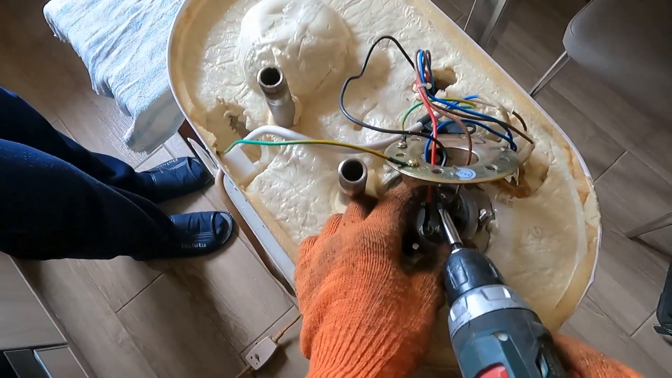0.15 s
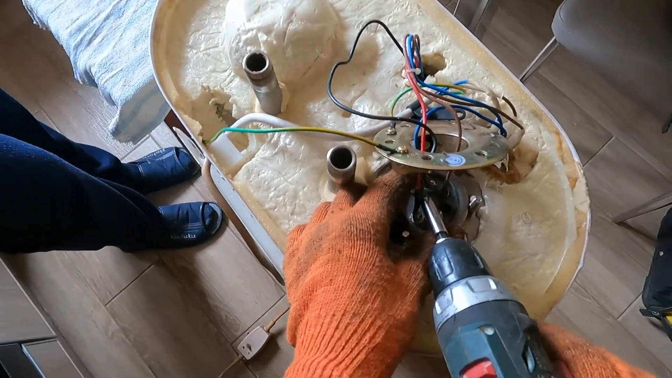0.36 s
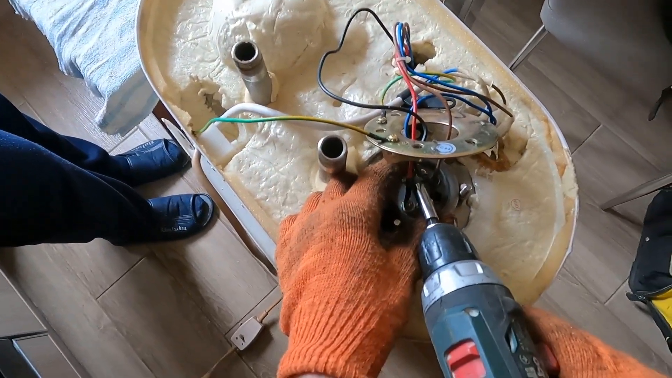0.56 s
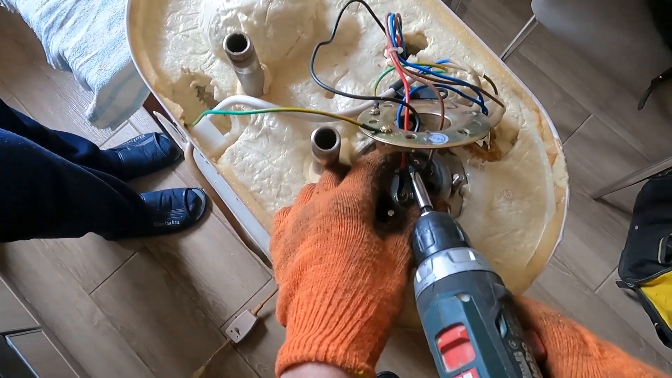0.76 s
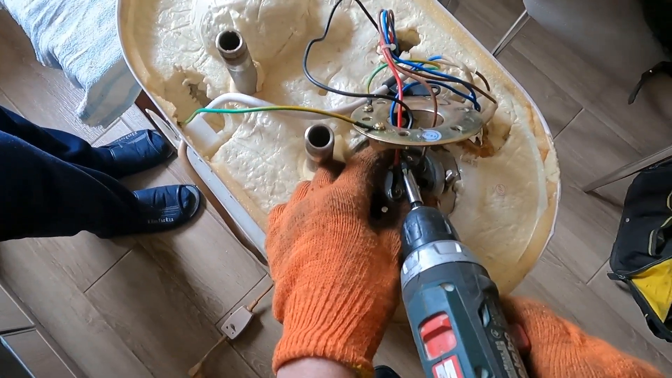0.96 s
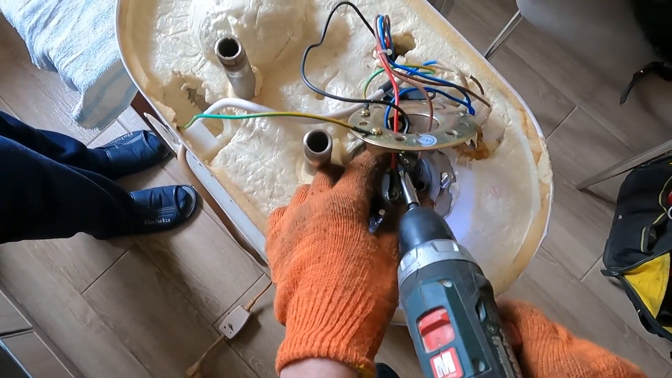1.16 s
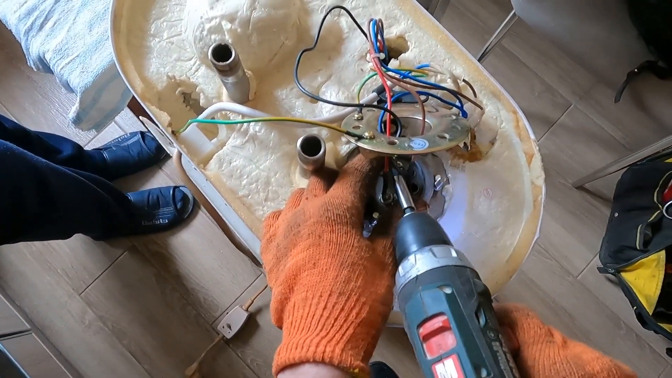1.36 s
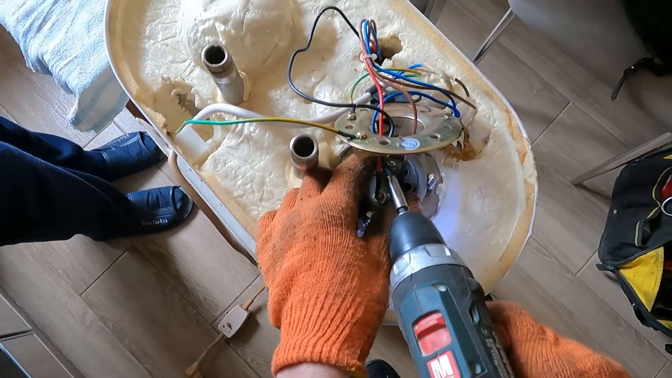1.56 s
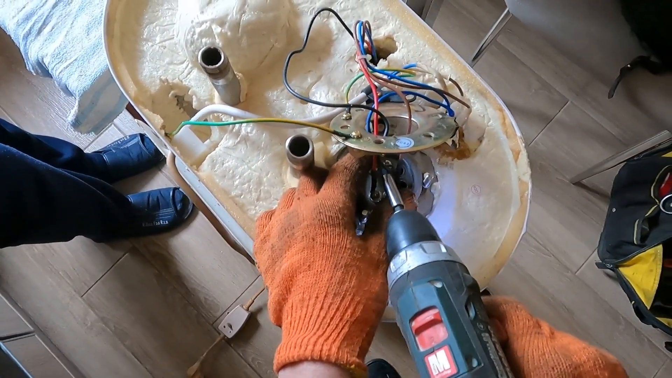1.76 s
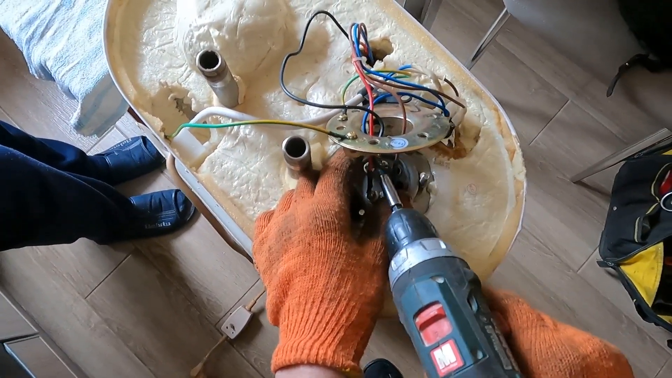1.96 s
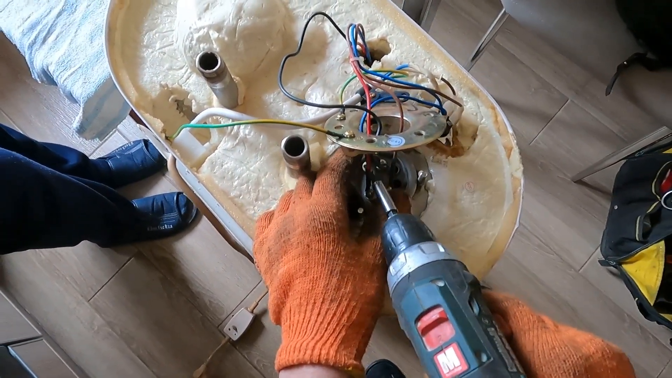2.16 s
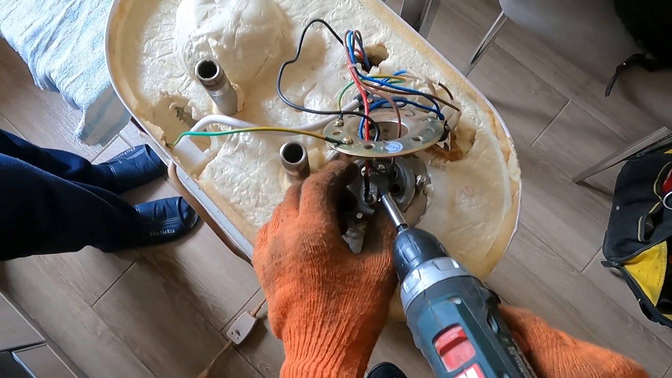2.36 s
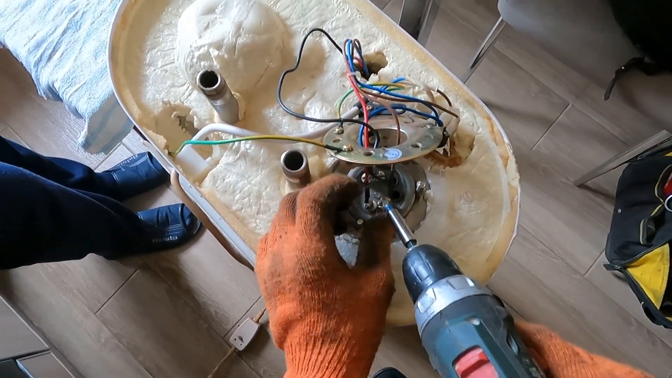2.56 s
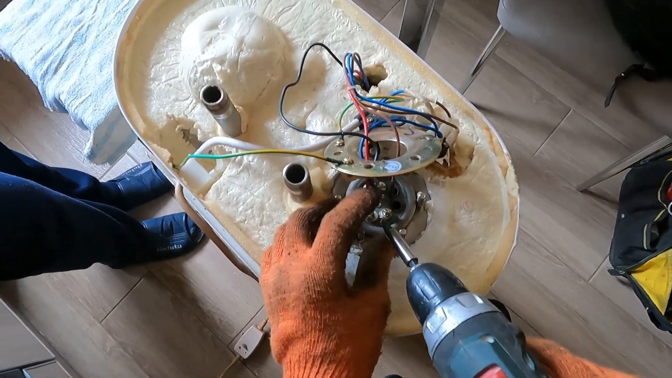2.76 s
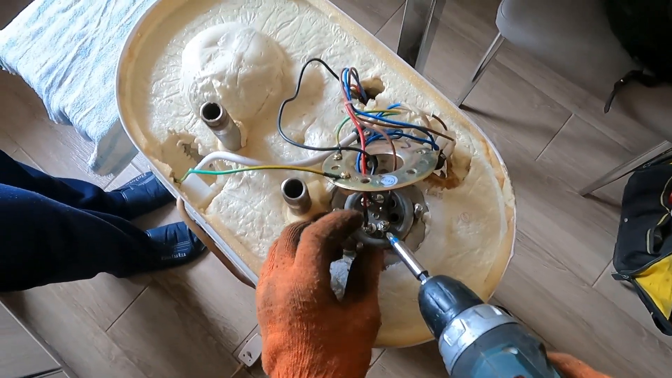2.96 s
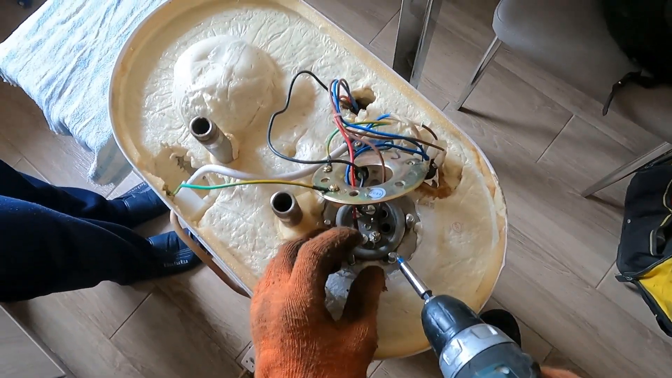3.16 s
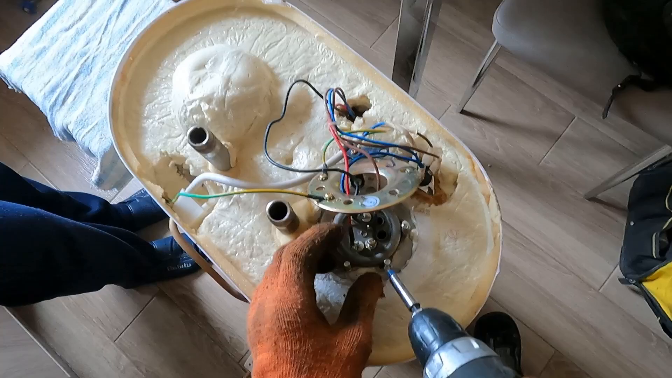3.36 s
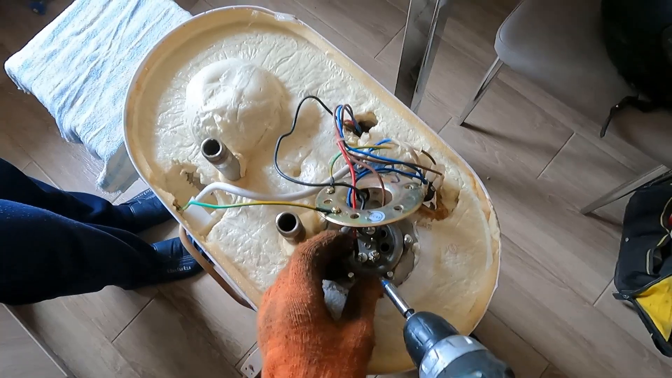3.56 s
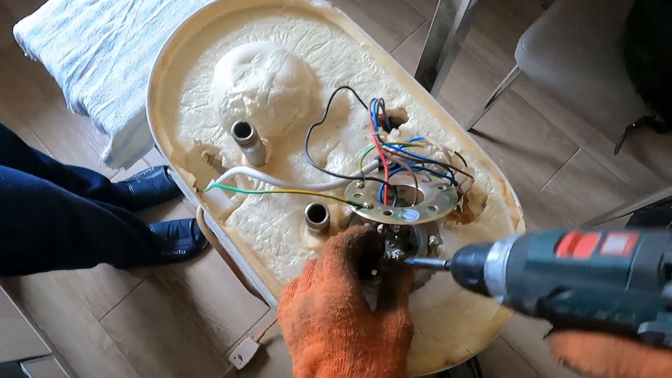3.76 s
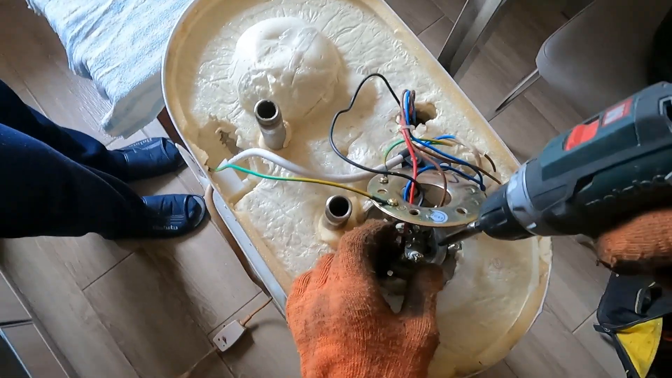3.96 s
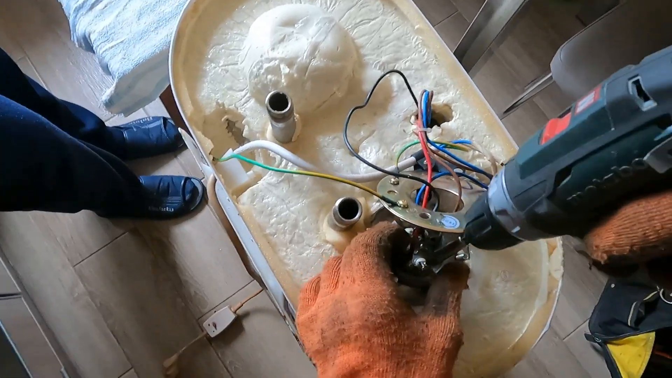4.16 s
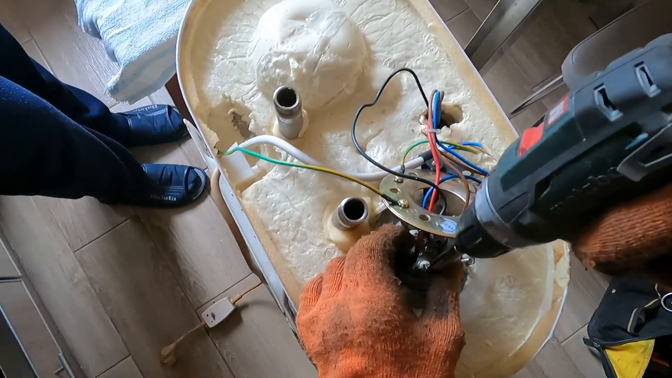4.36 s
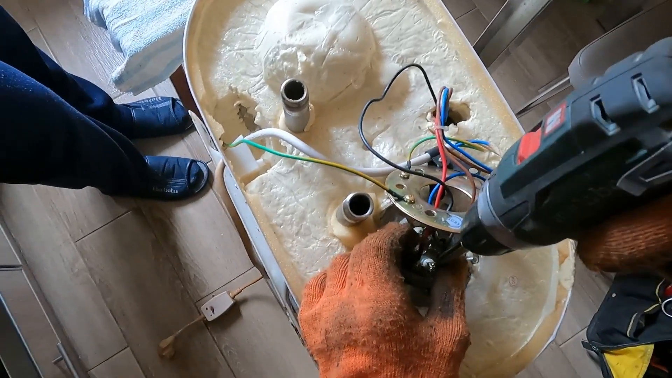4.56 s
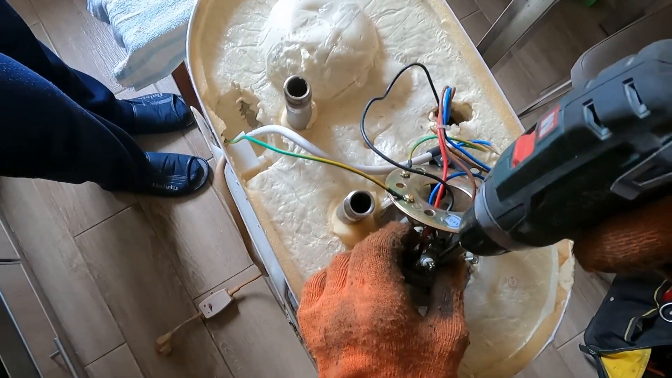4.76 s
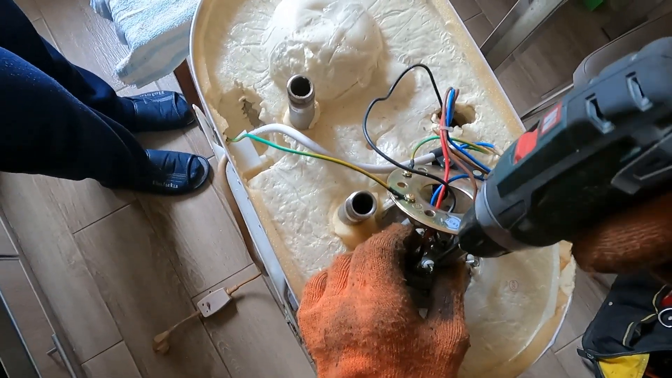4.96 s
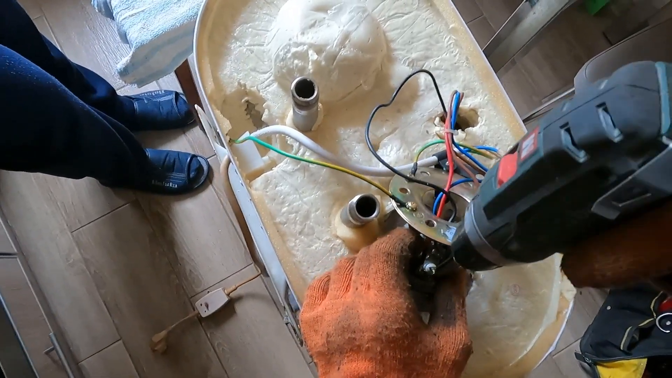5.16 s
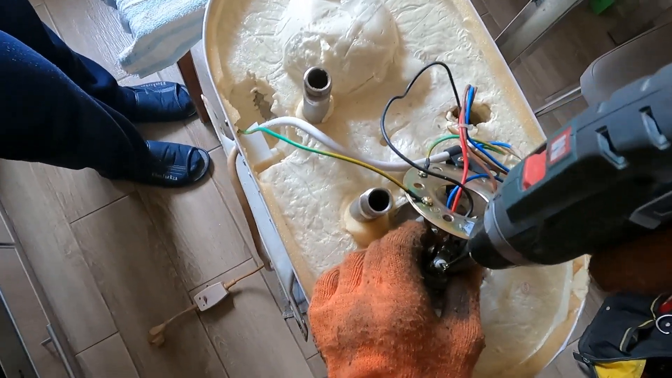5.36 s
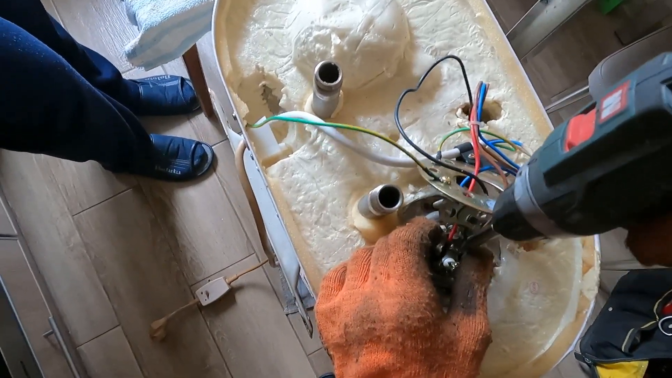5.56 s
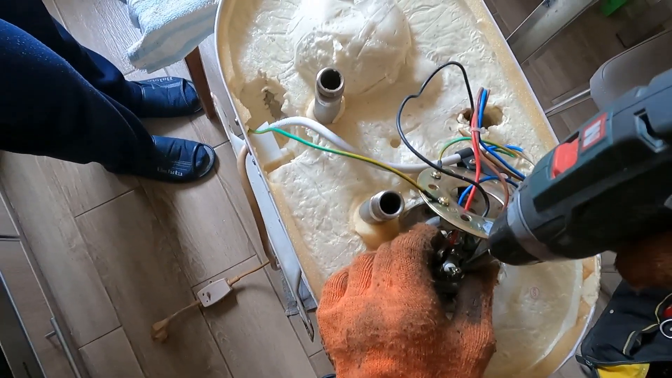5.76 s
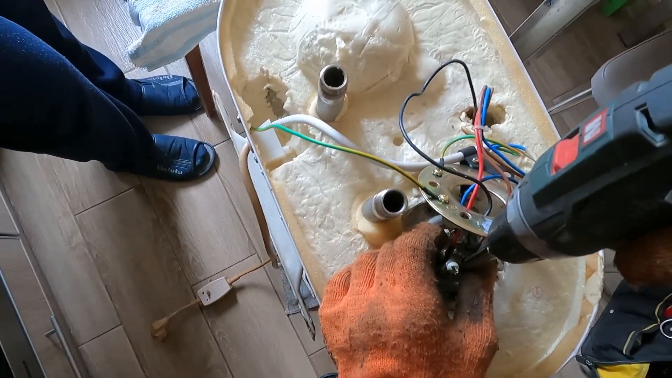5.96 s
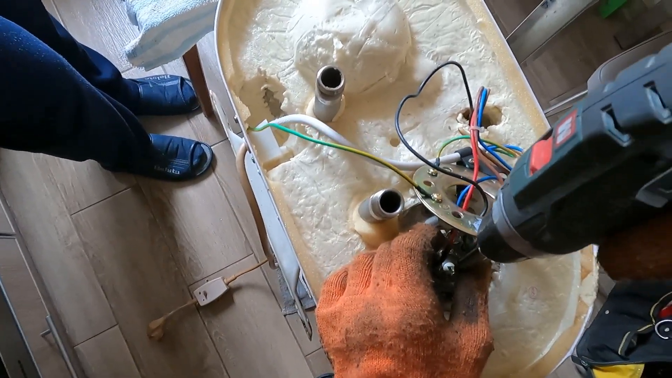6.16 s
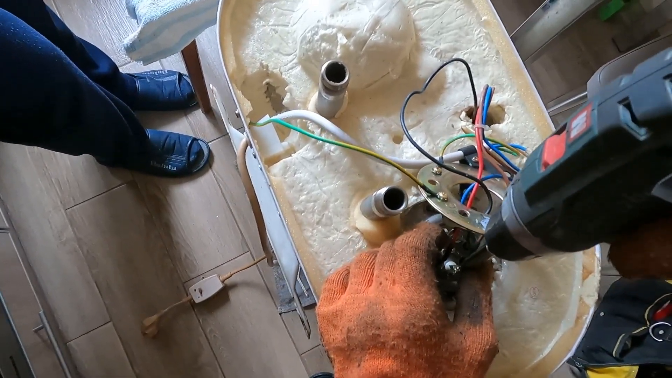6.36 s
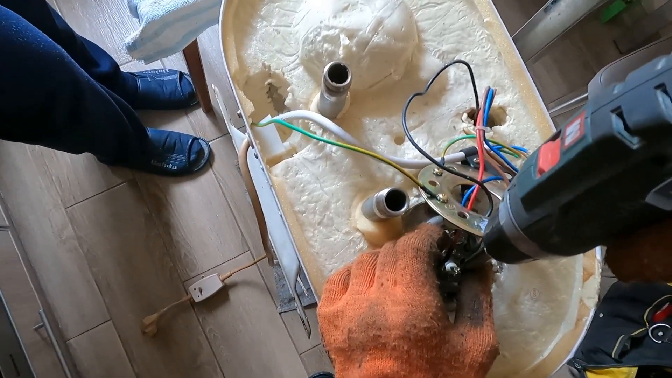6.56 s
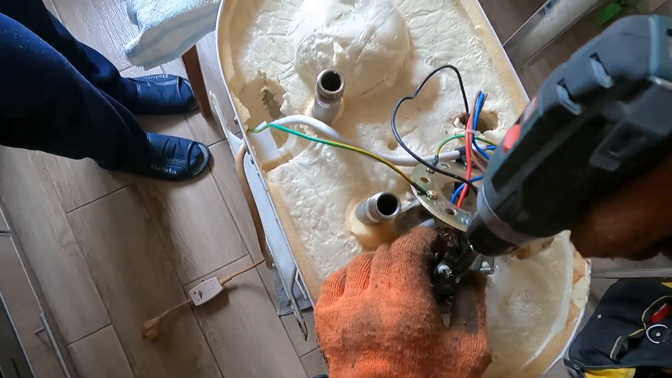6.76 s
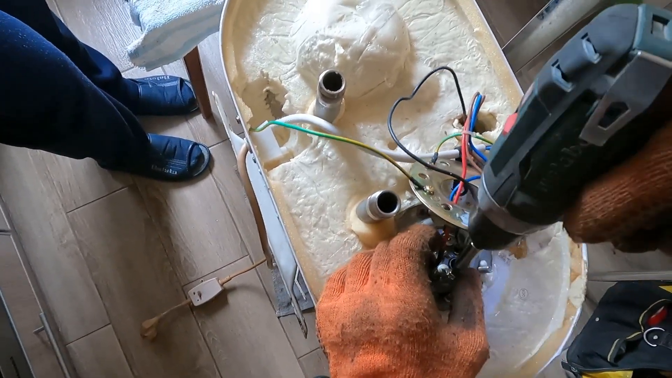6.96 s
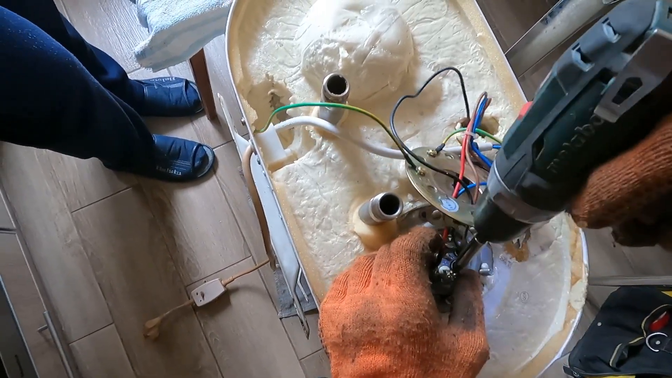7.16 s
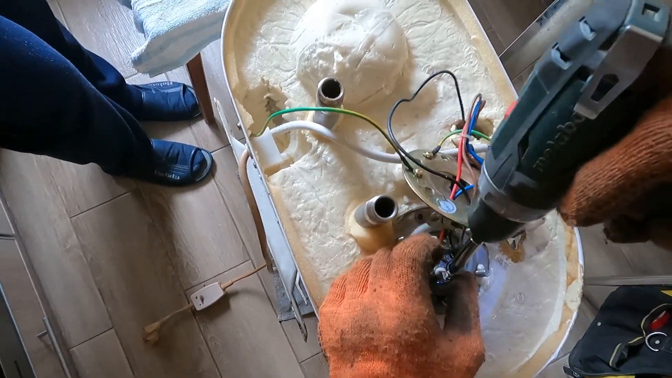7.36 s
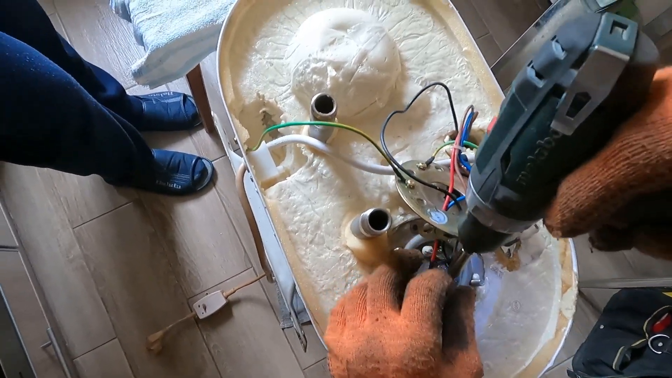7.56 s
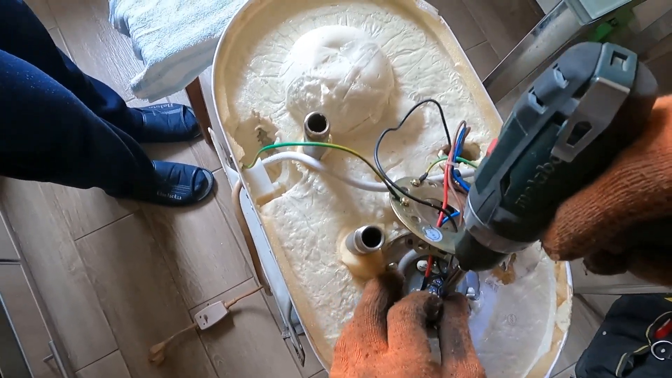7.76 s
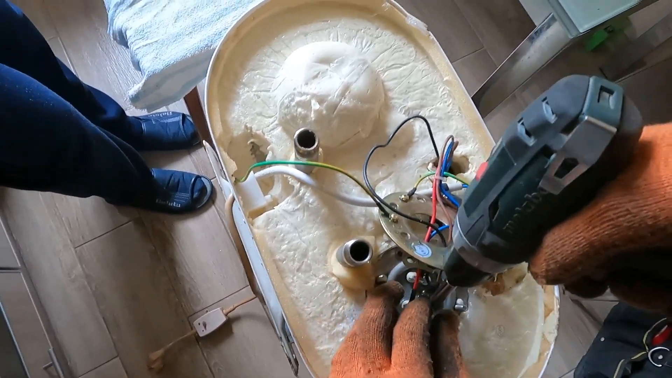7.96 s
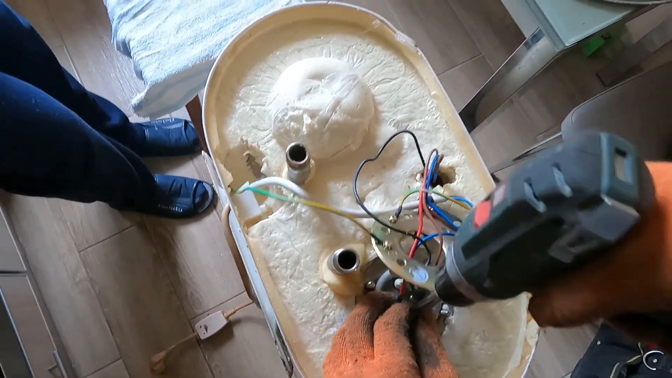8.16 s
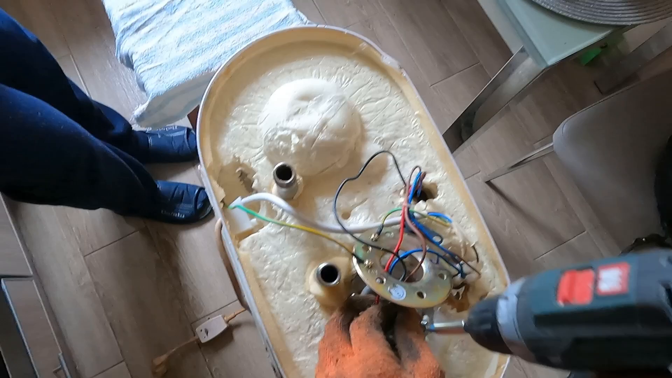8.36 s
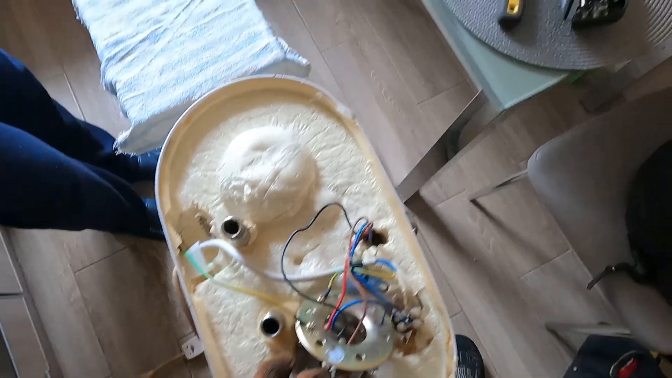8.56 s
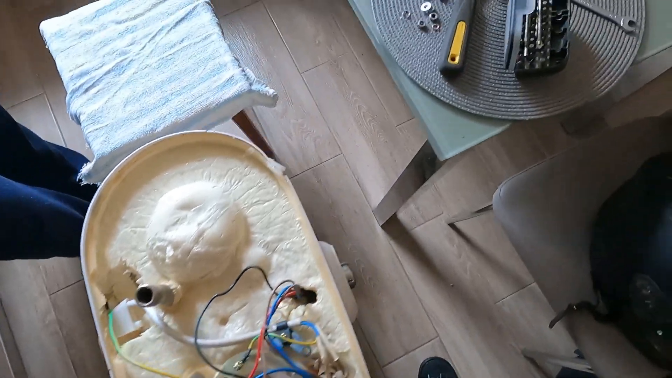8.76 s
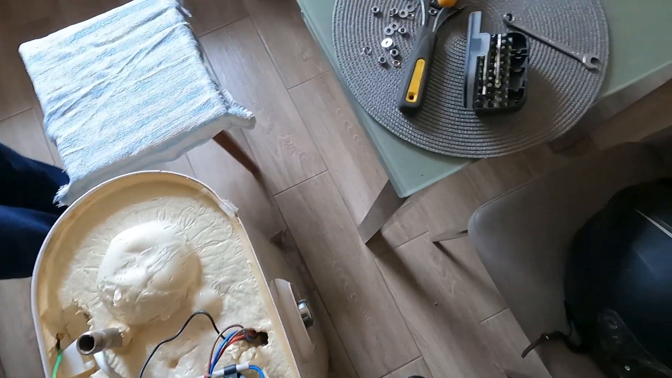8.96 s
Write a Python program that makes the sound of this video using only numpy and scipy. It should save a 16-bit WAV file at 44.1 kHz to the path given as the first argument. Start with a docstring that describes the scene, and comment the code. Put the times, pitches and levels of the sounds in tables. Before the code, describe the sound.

A low hum fills a small room, and the work is heard up close. Gloves rustle and small parts tick, with a few soft thumps. At about 1.1 seconds a cordless drill starts with a thin, high whistle, its motor whine climbing over rattling gears, then holds and stops with a click at 2 seconds. Faint ticks, light scrapes and glove rubbing follow. From 4 to 6 seconds a steel socket clinks more sharply against nuts, and the water heater tank gives dull knocks, the strongest near 5.9 seconds. Around 7 seconds the drill starts again with a whistle and a sharp click, running slower and lower, and winds down by about 8.1 seconds. A short scrape, a few last metallic clinks and some rustling continue until about 9 seconds.

```python
"""A cordless drill-driver undoes nuts on a water heater in a small room, heard from the worker's head.
Gloves rustle and parts tick; at 1 s the drill runs: the switch chops its current, the motor whines on
multiples of its shaft speed, and the gear teeth rattle the housing. Then the steel socket scrapes and
clinks on nuts, and the tank knocks and rocks. At 7 s the drill runs again, more slowly, and a few last
clinks follow. The room hums low throughout."""
import sys
import numpy as np
from scipy import signal
from scipy.fft import rfft, irfft, next_fast_len
from scipy.io import wavfile
from scipy.ndimage import uniform_filter1d

SR = 44100
rng = np.random.default_rng(int(sys.argv[2]) if len(sys.argv) > 2 else 0)


def store_wav(level_fs):
    """Save 16-bit WAV to argv[1]."""
    pcm = np.round(np.clip(np.atleast_2d(level_fs), -1, 1) * 32767)
    wavfile.write(sys.argv[1], SR, pcm.T.astype(np.int16))


N = 397341
T = np.arange(N) / SR

# Modes of the tank shell. Each row: frequency in Hz, level in dB, 60 dB decay time in seconds.
TANK_MODES = [(950, -5, .045), (1140, -3, .055), (1340, 0, .07), (1600, -2, .055), (1900, -4, .05),
              (2270, -7, .05)]
# Hand and tool thumping the shell. Each row: start in seconds, level in dB, pitch in Hz, rumble in dB.
THUMPS = [(0.181, -38, 184, -66), (0.25, -55, 180, -60), (0.605, -44.5, 190, -54), (0.764, -39.5, 157, -56),
          (3.581, -65, 180, -69), (4.728, -36.5, 190, -55), (5.091, -36.5, 179, -48), (5.2, -38, 166, -52),
          (5.306, -47, 197, -58), (5.521, -55, 171, -53), (5.551, -41.5, 170.5, -51),
          (5.605, -55, 170, -57), (5.853, -27, 167.6, -48), (5.878, -32, 151, -56),
          (5.976, -36.5, 156.5, -66), (6.151, -59, 189, -57.5), (6.502, -40.5, 164, -51),
          (6.597, -41.5, 180, -62), (6.861, -50.5, 180, -60), (8.669, -45, 184, -62), (8.76, -58, 180, -57),
          (8.93, -57, 180, -60)]


def drill():
    """Superposition: motor, gears and switch sound together in each of two pulls of the trigger."""
    # Course of a pull. Each row: time in seconds, shaft speed in Hz, gear rattle in dB.
    runs = [(1.09, 71.2, -42), (1.118, 98.8, -39), (1.15, 126.7, -22.5), (1.292, 221.9, -20.5),
            (1.42, 305.2, -22.5), (1.52, 313.5, -22.5), (1.9, 316.6, -22.5), (1.964, 313.8, -23.5),
            (1.98, 240, -21.5), (2.002, 145, -31), (2.12, 80, -66.5)], [(6.96, 49.95, -57), (7.0, 69.98, -42), (7.04, 91.8, -31), (7.09, 118.8, -23),
                           (7.2, 166.9, -22.5), (7.29, 186.4, -22.5), (7.55, 204.6, -23),
                           (7.69, 197, -23.5), (7.79, 177.6, -24.5), (7.99, 113.3, -26.5),
                           (8.074, 76.6, -45), (8.12, 58, -75)]
    # Strong partials. Each row: shaft multiple, level in dB re the rattle, shaft speed in Hz at which
    # the housing sings it loudest, loss in dB an octave away.
    strong = [(3, -11, 320, 18), (6, -10, 320, 30), (12, -18, 170, 5)], [(3, -9, 223, 22), (5.4, -16, 165, 9), (12, -11, 150, 35)]
    # Weak partials. Each row: shaft multiple, level at top speed in dB re the rattle.
    weak = [(1, -28.5), (9, -12), (11, -19), (15, -12), (16, -18.5), (21, -18), (22, -22.5)], [(1, -22.5), (6, -19), (8, -23), (9, -15), (11, -16.5), (19, -20), (20.4, -19)]
    # Colour of the housing as it is held in each pull. Each row: frequency in Hz, gain in dB.
    housings = [(150, -60.5), (250, -28.5), (307, -21), (346, -16), (711, -13.5), (935, -4.5), (1130, -8),
                (1820, -5), (2360, -11), (2850, -5), (4440, -8), (6940, -5), (10300, -5.5), (14000, -18),
                (15000, -45)], [(150, -47), (250, -18.5), (488, -16), (599, -11), (652, -11),
                                   (1000, -8.5), (1340, -9.5), (2200, -9), (2660, -12), (3810, -7.5),
                                   (6480, -10), (7690, -6), (13100, -15.5), (13800, -33), (15000, -98)]
    # Resonances of gearbox and shell. Each row: centre in Hz, width in Hz, lift in dB.
    gearboxes = [(1524, 320, 8), (3400, 300, 3.5), (5200, 920, 7), (7050, 280, 7.5), (8550, 170, 2)], [(980, 100, 3.7), (1470, 150, 6.6), (3100, 230, 3.8), (3810, 370, 5.3),
                                    (5140, 910, 2.9), (7240, 340, 1)]
    # Switch whistle per pull, fading as the trigger goes in. Each row: time in seconds, level in dB.
    whistles = [
        [(1.095, -41), (1.12, -33), (1.19, -34), (1.22, -41), (1.3, -74)],
        [(6.951, -39.5), (7.0, -35.5), (7.15, -33), (7.3, -40.5), (7.6, -43), (7.9, -51), (8.0, -66)],
    ]
    out = np.zeros(N)
    for pull, run in enumerate(runs):
        t, shaft_hz, rattle_db = trace(run)
        angle = 2 * np.pi * np.cumsum(shaft_hz * (1 + .002 * walk(len(t), 80))) / SR
        rattle = gear_rattle(angle, rattle_db, housings[pull], gearboxes[pull])
        whine = motor_whine(angle, shaft_hz, strong[pull], weak[pull])
        shake = tank_shake(t - t[0])
        fade = np.clip(np.minimum(t - t[0], t[-1] - t) / 0.015, 0, 1)
        add(out, fade * undb(rattle_db) * (rattle + whine + shake), t[0])
        add(out, switch_whistle(whistles[pull]), whistles[pull][0][0])
    return out


def gear_rattle(angle, rattle_db, housing, gearbox, gear_ratio=5):
    """Source and filter: uneven tooth impacts excite the resonances of housing and gearbox."""
    carrier = angle / gear_ratio
    wear = rng.standard_normal(720)  # this pattern repeats with each turn of the planet carrier
    pattern = unit(np.interp(carrier / (2 * np.pi) % 1, np.linspace(0, 1, len(wear)), wear))
    teeth = (rng.standard_normal(len(angle)) + .35 * pattern) * undb(walk(len(angle), 700))
    teeth *= (1 + 0.095 * np.cos(angle)) * (1 + 0.069 * np.cos(carrier))
    high, low = split(resonate(colour(teeth, housing), gearbox))
    slack = np.clip((rattle_db.max() - rattle_db) / 12, 0, 1)  # barely loaded teeth sound duller
    return high + undb(-5.5 + 9.5 * slack ** 2) * low


def motor_whine(angle, shaft_hz, strong, weak, brake_db=4, weak_db_per_octave=20):
    """Rotational orders: partials follow the shaft speed; the strong ones swell as the motor slows."""
    octaves_per_s = uniform_filter1d(np.gradient(np.log2(shaft_hz)) * SR, size=400)
    swell_db = brake_db * np.tanh(np.maximum(-octaves_per_s, 0) / 4)
    whine = sum(undb(db + 0.5 * walk(len(angle), 45)) * np.sin(k * angle + k) for k, db in weak)
    whine *= undb(weak_db_per_octave * np.log2(shaft_hz / shaft_hz.max()))
    for k, db, loudest_hz, loss_db in strong:
        off_peak_db = loss_db * np.log2(shaft_hz / loudest_hz) ** 2
        whine += undb(db + swell_db - off_peak_db + 2.2 * walk(len(angle), 23)) * np.sin(k * angle)
    return np.sqrt(2) * whine


def switch_whistle(levels, chop_hz=1900):
    """Magnetic forcing: the chopped current makes the windings whistle at a constant pitch."""
    # Whistle spectrum. Each row: multiple of the chopping rate, level in dB.
    harmonics = [(1, 2), (2, -5.5), (3, -12.5), (4, -9.5), (5, -22), (6, -26)]
    t, level_db = trace(levels)
    tone = sum(undb(db) * np.sin(2 * np.pi * k * chop_hz * t) for k, db in harmonics)
    return np.sqrt(2) * undb(level_db) * tone


def tank_shake(t, level_db=-22.5, jolt_db=13, jolt_at_s=0.084):
    """Forced vibration: the drill shakes the tank, with a jolt as the nut breaks free."""
    # Response of the tank. Each row: frequency in Hz, gain in dB.
    response = [(25, -26.5), (55, 2), (100, -5.5), (180, 2), (260, -17), (400, -41)]
    jolt = np.exp(-np.abs(t - jolt_at_s) / 0.06)
    return undb(level_db + jolt_db * jolt) * unit(colour(rng.standard_normal(len(t)), response))


def socket_clinks(ring_db=-17, seat_s=0.0091):
    """Impact excitation: the socket hits a nut with a noise burst, then socket and tank ring freely."""
    # Blows. Each row: start in seconds, level in dB, tank knock in dB re the blow, tilt in dB per
    # octave, frequency in Hz that the struck spot favours, damping factor of the grip.
    blows = [(4.0302, -35.5, -5, -11, 4340, 2.1), (4.1684, -11.5, -23.5, -6, 7140, 2.6),
             (4.2361, -30, -13, -9, 7620, 1.5), (4.2547, -18.5, -14, -12, 7000, 2.8),
             (4.349, -13, -21, -2.5, 4730, 3), (5.5469, -14, -17.5, 0, 6640, 2.8),
             (5.5783, -8.5, -23.5, 5.5, 4700, 4.1), (8.2205, -15, -21, -3.5, 4200, 2.35),
             (8.3862, -36.5, -20.5, -2.5, 6640, 1.9), (8.4202, -36.5, -25, 11, 11100, 1.7),
             (8.6146, -41.5, -16, -0.5, 7000, 1.3), (8.6401, -46, -10, 9, 7000, 1.1),
             (8.6648, -18.5, -38, 5, 11100, 1.08)]
    # Modes of the free socket. Each row: frequency in Hz, level in dB, 60 dB decay time in seconds.
    socket_modes = [(3165, -10, .25), (4500, -8, .2), (4710, -2, .22), (5103, -8, .13), (5636, -14, .2),
                    (6860, -2, .25), (7058, -9, .18), (7350, -4, .2), (10070, -14, .15), (11075, -6, .15),
                    (11680, -9, .11), (12320, -11, .12), (12920, -12, .12)]
    out, t = np.zeros(N), np.arange(int(.3 * SR)) / SR
    noises, chances = rng.standard_normal((len(blows), 2048)), rng.standard_normal((len(blows), 32))
    seating = 1 + 1.85 * np.exp(-t / seat_s)  # the ring is strongest until the socket seats
    hz, mode_db, t60 = np.transpose(socket_modes)
    for (start, db, tank_db, tilt_db, spot_hz, damping), noise, chance in zip(blows, noises, chances):
        spot_db = 5 / (1 + (np.log2(hz / spot_hz) / 0.087) ** 2)
        gripped = np.column_stack([hz, mode_db + tilt_db * np.log2(hz / 6000) + spot_db, t60 / damping])
        socket = ring(gripped, t, chance, scatter_db=2, detune=0.0059, rough_db=5)
        tank = ring(TANK_MODES, t, chance[::-1], scatter_db=2.5, detune=.02, rough_db=4)
        add(out, undb(db) * contact(noise, 4640, fall_s=0.0033, q=0.92), start)
        add(out, undb(db + ring_db - 2 * damping) * seating * socket, start)
        add(out, undb(db + tank_db) * tank, start)
    return out


def ticks(hand_damping=1.8):
    """Damped impact: nuts, wires and trigger tick, and the shell, held by a hand, answers briefly."""
    # Light contacts. Each row: start in seconds, level in dB, tank knock in dB re the tick, centre in Hz.
    taps = [(0.1117, -41, -32, 7870), (0.13, -26.5, -23.5, 5000), (0.159, -38, -23, 5200),
            (0.194, -34.5, -14, 2970), (0.2718, -45, -19, 3270), (0.4213, -43, -33, 6300),
            (0.5891, -30, -28.5, 4070), (0.6878, -52, -33, 10400), (0.7297, -45, -22, 2960),
            (0.756, -28, -32.5, 3010), (0.7758, -29.5, -28, 5150), (0.8107, -39, -29, 5070),
            (0.8831, -47, -32, 5800), (0.8946, -34, -27, 3074), (1.027, -16, -35, 5404),
            (2.0193, -11.5, -23.5, 4400), (2.2598, -31, -48, 4910), (2.3565, -34.5, -25, 5030),
            (2.4394, -39, -41.5, 7100), (2.4594, -31, -41, 4970), (2.4762, -27.5, -43, 4610),
            (2.485, -29.5, -29, 7050), (2.5422, -28, -32, 3140), (2.5644, -28, -29, 4440),
            (2.616, -36, -42, 6600), (2.6654, -33.5, -45, 6850), (2.6743, -33, -44, 5720),
            (2.7445, -40, -45, 4660), (2.7567, -25.5, -52, 6820), (2.7877, -25, -54, 5070),
            (3.0707, -38, -17, 3450), (3.573, -34, -26, 2810), (3.5952, -36, -34, 5190),
            (3.606, -37, -31, 4970), (3.7298, -33.5, -44, 4840), (4.2044, -21.5, -18, 3320),
            (4.4228, -35, -34, 4710), (4.4647, -36, -29, 7330), (4.497, -34, -46, 5230),
            (4.572, -38.5, -46, 5300), (4.587, -31.5, -51, 5440), (4.7286, -38, -30, 6500),
            (4.7336, -36, -18, 6100), (4.8752, -36, -19, 7340), (5.006, -35.5, -41, 5220),
            (5.025, -25.5, -20.5, 6140), (5.0432, -36, -27, 6900), (5.0733, -11.5, -34, 4900),
            (5.121, -26, -44, 5200), (5.1314, -25.5, -16.5, 7100), (5.1785, -38, -30, 5290),
            (5.257, -36.5, -18, 5730), (5.272, -22.5, -23, 4900), (5.2944, -41, -13, 4470),
            (5.3294, -31.5, -21, 3210), (5.5329, -9.5, -28, 5300), (5.5945, -17, -21, 4660),
            (5.835, -27, -21, 6500), (5.9579, -45.5, -25.5, 6930), (6.0935, -54, -30, 8000),
            (6.143, -51, -12, 7060), (6.2188, -47.5, -28, 7970), (6.3405, -34.5, -28, 3670),
            (6.4709, -31.5, -28, 5500), (6.542, -47.5, -26.5, 8540), (6.701, -48, -38, 4500),
            (6.7555, -34.5, -40, 4510), (6.834, -29, -30, 6550), (6.868, -21, -45, 5470),
            (7.0344, -3, -23, 5160), (8.111, -22, -20, 2870), (8.342, -31, -30, 4950),
            (8.5013, -29, -31, 6790), (8.5274, -29.5, -32.5, 6090), (8.8047, -29.5, -22, 6660)]
    out, t = np.zeros(N), np.arange(int(.08 * SR)) / SR
    held = [(hz, db, t60 / hand_damping) for hz, db, t60 in TANK_MODES]
    noises, chances = rng.standard_normal((len(taps), 1024)), rng.standard_normal((len(taps), 32))
    for (start, db, tank_db, hz), noise, chance in zip(taps, noises, chances):
        tank = ring(held, t, chance, scatter_db=2.2, detune=0.08, rough_db=6)
        add(out, undb(db) * contact(noise, hz, fall_s=0.0017), start)
        add(out, undb(db + tank_db) * tank, start)
    return out


def scrapes(bandwidth=.06):
    """Stick-slip friction: the socket, dragged over metal, excites one resonance with uneven grains."""
    # Drags. Each row: start in seconds, length in seconds, level in dB, resonance in Hz.
    drags = [(2.353, 0.043, -57, 3270), (2.42, 0.029, -56.5, 4860), (2.538, 0.027, -52, 2950),
             (2.617, 0.085, -63, 4100), (2.783, 0.055, -56.5, 4740), (3.733, 0.11, -59, 2320),
             (3.756, 0.059, -56, 2900), (3.757, 0.19, -59, 3260), (4.028, 0.069, -53.5, 3190),
             (5.126, 0.093, -50, 840), (5.26, 0.038, -48, 966), (5.524, 0.015, -46.5, 4600),
             (8.154, 0.1, -43, 1247), (8.602, 0.026, -54, 6700), (8.654, 0.0076, -33, 6600),
             (8.651, 0.077, -44, 4600)]
    out = np.zeros(N)
    for start, length, db, hz in drags:
        size = int(length * SR)
        grains = rng.standard_normal(size) * undb(3 * walk(size, 200) + 4.3 * walk(size, 40))
        song = unit(signal.lfilter(*signal.iirpeak(hz, 1 / bandwidth, SR), grains))
        add(out, undb(db) * song * np.sqrt(np.sin(np.pi * np.arange(size) / size)), start)
    return out


def shell_thuds(rise_s=0.0013, fall_s=0.023):
    """Damped oscillation: each soft push sets the padded shell wobbling at one low pitch."""
    out, t = np.zeros(N), np.arange(int(.3 * SR)) / SR
    envelope = np.exp(-t / fall_s) * (1 - np.exp(-t / rise_s))
    for start, db, hz, _ in THUMPS:
        add(out, undb(db) * np.sin(2 * np.pi * hz * t) * envelope, start)
    return out


def tank_rocking(rest_db=-78):
    """Low-frequency response: the tank rocks with a deep rumble at each thump."""
    # Rumble spectrum. Each row: frequency in Hz, gain in dB.
    spectrum = [(20, -24), (50, 4), (80, -5), (110, -2), (140, -40)]
    surges = sum(undb(db) * swell(start, rise_s=0.016, fall_s=0.051) for start, _, _, db in THUMPS)
    return stretch(undb(rest_db) + surges) * unit(colour(rng.standard_normal(N), spectrum))


def rubbing():
    """Friction follows movement: the bright and dull strengths of the gloves' rubbing over time."""
    # Strokes. Each row: peak time in seconds, time constant in seconds, bright level in dB,
    # dull level in dB re the bright.
    strokes = [(0.01, 0.12, -58, -9), (0.18, 0.1, -67.5, 5), (0.46, .06, -69, -22), (0.76, 0.14, -73.5, 9),
               (1.0, 0.15, -62, -7.5), (2.33, 0.13, -59, -8), (2.68, 0.07, -61.5, -18),
               (3.11, 0.08, -70, 3), (3.3, .08, -80, 13), (3.55, 0.04, -69.5, 2), (3.8, 0.19, -59.5, -1),
               (4.25, 0.05, -48, -11), (4.38, 0.09, -59.5, 0.5), (4.84, 0.05, -75, -1),
               (5.17, 0.11, -58.5, 8.5), (5.33, 0.07, -77.5, 7.5), (5.66, 0.11, -66.5, 5.5),
               (5.92, 0.02, -79, 15), (6.17, .08, -71, -8), (6.36, .08, -71, -5), (6.74, 0.12, -65.5, -22),
               (6.86, 0.08, -47.5, -7.5), (8.14, 0.07, -60, 3), (8.23, 0.04, -50.5, -6),
               (8.37, .05, -67.5, 6), (8.45, 0.1, -55.5, -15), (8.74, 0.1, -57, -6.5),
               (8.85, .07, -58.5, 5), (9.0, 0.05, -54.5, -0.5)]
    shapes = np.array([swell(peak_s, tau, tau) for peak_s, tau, *_ in strokes])
    bright_db, dull_db = np.transpose(strokes)[2:]
    return stretch(undb(bright_db) @ shapes), stretch(undb(bright_db + dull_db) @ shapes)


def glove_rustle(bright, dull):
    """Friction noise: countless slips of fibre and grit merge into dense, uneven grains."""
    # Glove spectrum. Each row: frequency in Hz, gain in dB.
    spectrum = [(290, -36.5), (500, 4), (871, 2.5), (1430, 3.5), (2390, -6), (3050, -3.5), (6670, -5.5),
                (12100, -22.5), (15000, -41)]
    grains = rng.standard_normal(N) * undb(3 * walk(N, 500) + 1.5 * walk(N, 25))
    high, low = split(colour(grains, spectrum))
    return bright * high + dull * low


def grit(rubbing_strength, ticks_per_s=8):
    """Random micro-impacts: faint ticks scale with the rubbing around them."""
    out = np.zeros(N)
    for when, size, pitch in rng.random((int(ticks_per_s * N / SR), 3)):
        tick = contact(rng.standard_normal(1024), 3000 + 4500 * pitch, fall_s=0.0016)
        add(out, rubbing_strength[int(when * N)] * undb(9 * size - 1.5) * tick, when * N / SR)
    return out


def room_echo(sound, t60_s=0.3, dull_hz=5030, delay_samples=200):
    """Reverberation: the walls return a dulled, diffuse tail after a short delay."""
    tail = signal.lfilter(*signal.butter(1, dull_hz, fs=SR), diffuse(t60_s, size=30000))
    return signal.fftconvolve(sound, np.r_[np.zeros(delay_samples), tail])[:N]


def room_hum(level_db=-54, side_db=-15):
    """Partial coherence: the building's low murmur is slightly unlike on the left and right."""
    # Murmur spectrum. Each row: frequency in Hz, gain in dB.
    spectrum = [(15, -39.5), (25, -17.5), (54, -24), (103, -23.5), (145, -6.5), (191, 2), (226, -8.5),
                (286, -2.5), (470, -19.5), (575, -20.5), (1150, -29), (1460, -33), (2000, -37), (2600, -47),
                (4400, -120)]
    mid, side = (unit(colour(rng.standard_normal(N), spectrum)) for _ in range(2))
    return undb(level_db + walk(N, 8.4)) * (mid + undb(side_db) * side * np.array([[1], [-1]]))


def ring(modes, t, chance, scatter_db, detune, rough_db):
    """Modal decay: every blow weights and detunes the modes anew, and loose contact roughens each."""
    hz, db, t60 = np.transpose(modes)[:, :, None]
    roughness = rough_db * np.array([walk(len(t), 380) for _ in hz])
    gain = undb(db + scatter_db * chance[:len(hz), None] + roughness)
    hz = hz * (1 + detune * chance[-len(hz):, None])
    return np.sum(gain * np.sin(2 * np.pi * hz * t) * 1000 ** (-t / t60), 0)


def contact(noise, hz, fall_s, q=1.43):
    """A brief contact has a broad spectrum: a decaying noise burst, band-passed twice around hz."""
    b, a = signal.iirpeak(hz, q, SR)
    fall = np.exp(-np.arange(len(noise)) / SR / fall_s)
    burst = noise * fall * np.sqrt(np.sum(fall ** 2) / np.sum((noise * fall) ** 2))
    return signal.lfilter(b, a, signal.lfilter(b, a, burst))


def diffuse(t60, size):
    """A diffuse field: an exponentially decaying cloud of echoes with unit energy."""
    echo = rng.standard_normal(size) * 1000 ** (-np.arange(size) / SR / t60)
    return echo / np.sqrt(np.sum(echo ** 2))


def resonate(x, peaks):
    """Resonance: a bell-shaped lift in dB around each peak."""
    hz = np.fft.rfftfreq(len(x), 1 / SR)
    lift_db = sum(db / (1 + (2 * (hz - centre) / width) ** 2) for centre, width, db in peaks)
    return irfft(rfft(x) * undb(lift_db), len(x))


def colour(x, table):
    """Linear filtering by a curve of gain in dB against frequency."""
    return irfft(rfft(x) * undb(over_hz(table, len(x))), len(x))


def over_hz(table, size):
    """A curve interpolated in log frequency at the bins of a transform."""
    hz, value = np.transpose(table)
    return np.interp(np.log(np.fft.rfftfreq(size, 1 / SR) + 1), np.log(hz + 1), value)


def split(x, crossover_hz=2500):
    """A crossover: the high and the low band, each at unit RMS."""
    filters = (signal.butter(4, crossover_hz, kind, fs=SR, output="sos") for kind in ("high", "low"))
    return [unit(signal.sosfilt(sos, x)) for sos in filters]


def walk(size, rate_hz):
    """Smooth random fluctuation at unit RMS."""
    span = max(int(SR / rate_hz), 1)
    return unit(uniform_filter1d(uniform_filter1d(rng.standard_normal(size), span), span))


def trace(table):
    """Sample times across a table of breakpoints, then each column interpolated at them."""
    times, *columns = np.transpose(table)
    t = np.arange(times[0], times[-1], 1 / SR)
    return t, *(np.interp(t, times, column) for column in columns)


def swell(peak_s, rise_s, fall_s):
    """A coarse envelope: exponential growth to 1, then exponential decay."""
    t = T[::32]
    return np.exp(np.where(t < peak_s, (t - peak_s) / rise_s, (peak_s - t) / fall_s))


def stretch(envelope):
    """A coarse envelope read at every sample."""
    return np.interp(T, np.linspace(0, T[-1], len(envelope)), envelope)


def add(out, sound, start_s):
    """Mix a sound in from its start time."""
    i = int(start_s * SR)
    out[..., i:i + sound.shape[-1]] += sound[..., :N - i]


def undb(db):
    """Decibels as an amplitude ratio."""
    return 10 ** (np.asarray(db) / 20)


def unit(x):
    """A signal scaled to unit RMS."""
    return x / np.sqrt(np.mean(x ** 2))


def scene():
    """Direct and reverberant sound add; the drill is nearer than the tank, so it sounds drier."""
    bright, dull = rubbing()
    low_cut = signal.butter(3, 750, "high", fs=SR, output="sos")  # ticks, clinks and grit carry no bass
    metal = signal.sosfilt(low_cut, ticks() + socket_clinks() + grit(bright))
    handling = metal + scrapes() + shell_thuds()
    tool = drill()
    walls = room_echo(undb(-5.5) * handling + undb(-11) * tool)
    return handling + tool + walls + glove_rustle(bright, dull) + tank_rocking() + room_hum()


def record(dry):
    """Spaced receivers: two close microphone ports hear the mids unequally and partly incoherently."""
    # Phase between the ports. Each row: frequency in Hz, lead of the left in radians.
    lead = [(0, 0), (600, 0.1), (1720, -0.6), (2500, -0.7), (2840, -1.2), (3450, -1.3), (3700, -1.4),
            (4050, -1.3), (4390, -1.0), (4650, 0.3), (5430, -0.0), (14700, 0.0), (15300, -0.1)]
    # Balance of the ports. Each row: frequency in Hz, left minus right in dB.
    balance = [(150, 0), (400, -1.5), (1300, -2.5), (2400, -4), (4700, -5), (5600, 0)]
    # Incoherent part. Each row: frequency in Hz, level in dB re the sound.
    incoherence = [(60, -21), (400, -17), (1500, -11), (2500, -9), (4000, -5), (4900, -3), (5400, -27),
                   (10000, -27), (13000, -12)]
    # Treble droop of the microphone. Each row: frequency in Hz, gain in dB.
    droop = [(9000, -1.5), (12000, -4.5), (14000, -8), (15500, -28.5)]
    size = next_fast_len(N)
    left_gain = undb(over_hz(balance, size) / 2) * np.exp(.5j * over_hz(lead, size))
    smear = rfft(diffuse(0.19, size=12000), size) * undb(over_hz(incoherence, size))
    apart = rfft(dry.mean(0), size) * smear
    ports = rfft(dry, size) * np.array([left_gain, 1 / left_gain]) + np.array([apart, -apart])
    heard = irfft(ports * undb(over_hz(droop, size)), size)[:, :N]
    top_cut = signal.ellip(8, .2, 70, 15500, fs=SR, output="sos")
    return signal.sosfilt(top_cut, heard)


dry = scene()
out = record(dry)
store_wav(out)
```